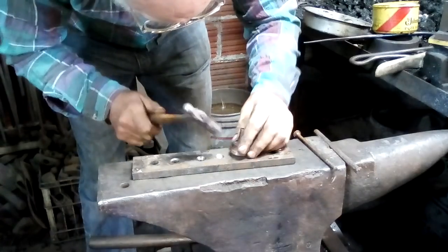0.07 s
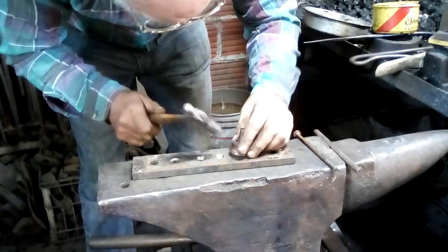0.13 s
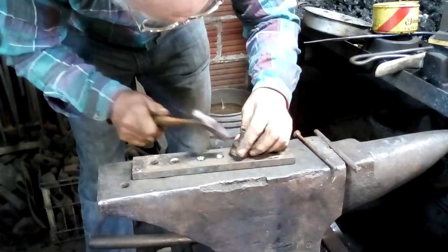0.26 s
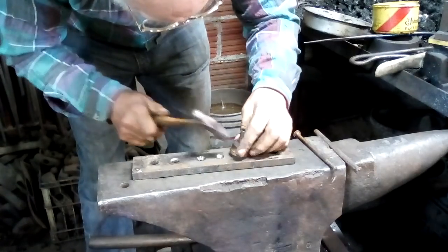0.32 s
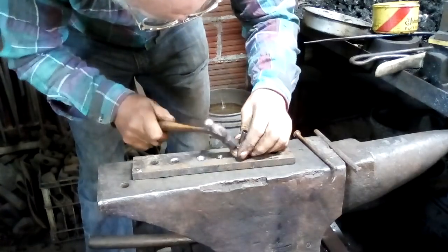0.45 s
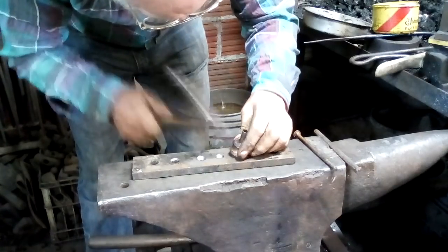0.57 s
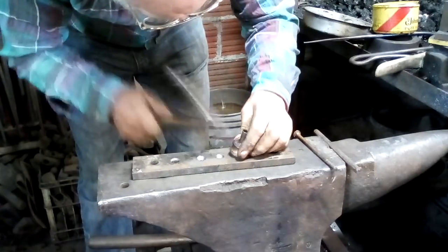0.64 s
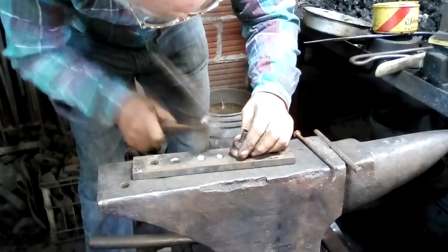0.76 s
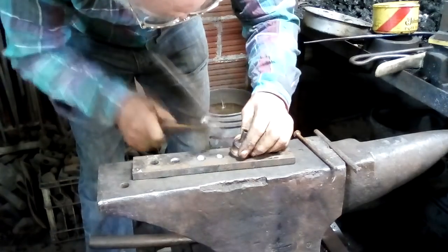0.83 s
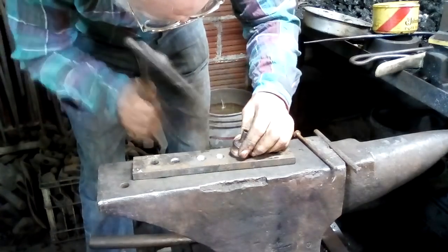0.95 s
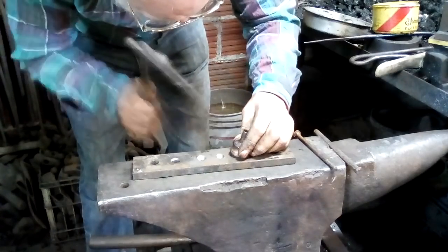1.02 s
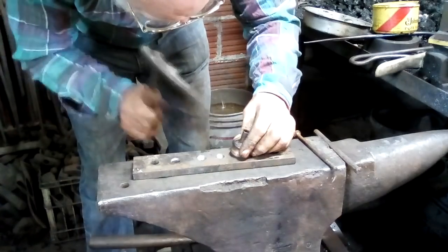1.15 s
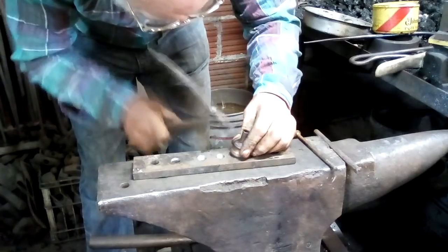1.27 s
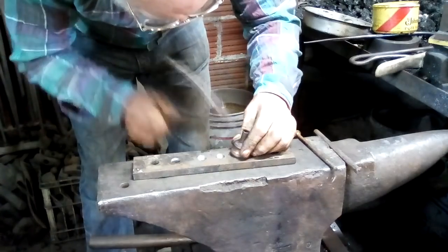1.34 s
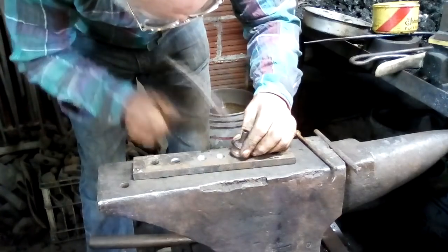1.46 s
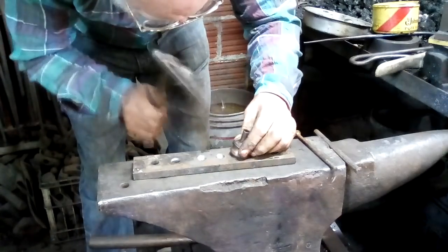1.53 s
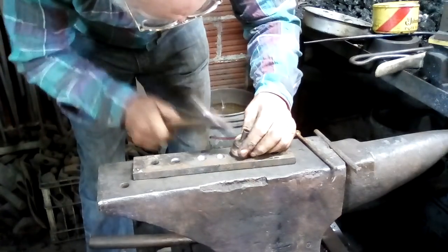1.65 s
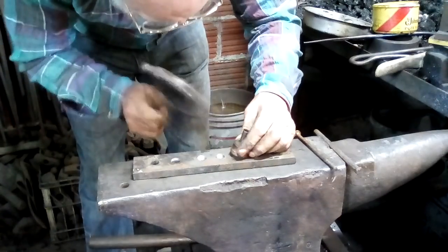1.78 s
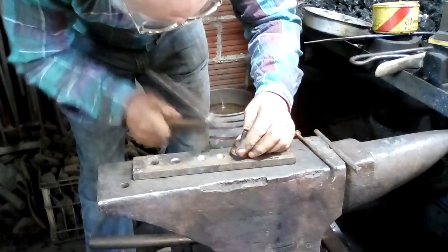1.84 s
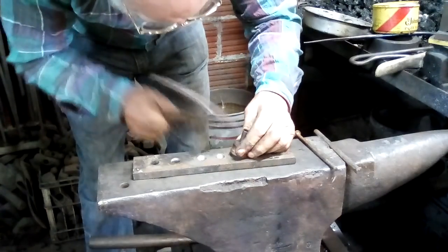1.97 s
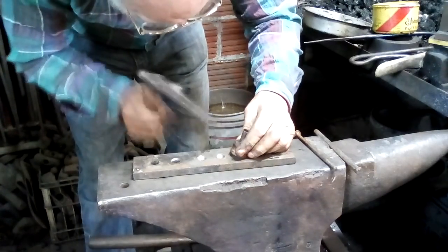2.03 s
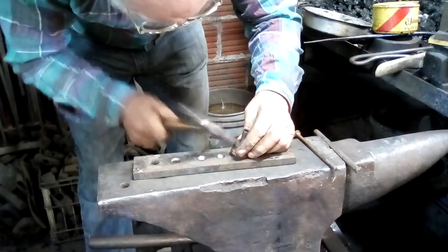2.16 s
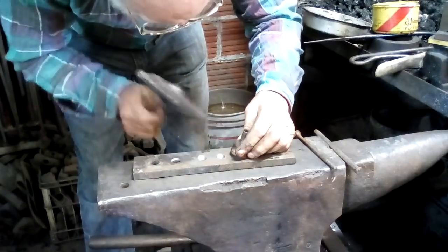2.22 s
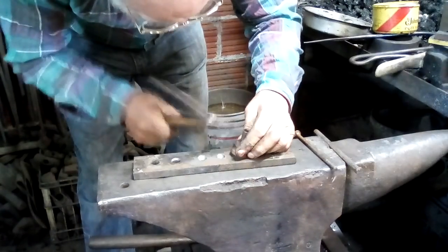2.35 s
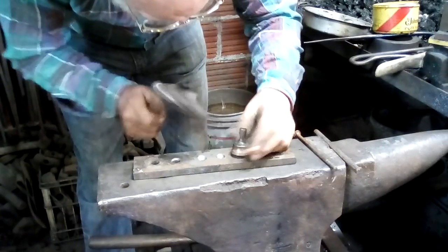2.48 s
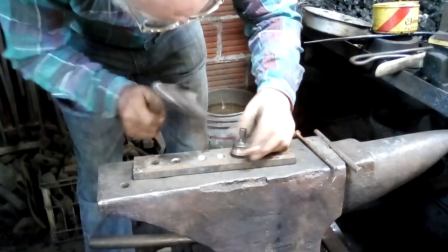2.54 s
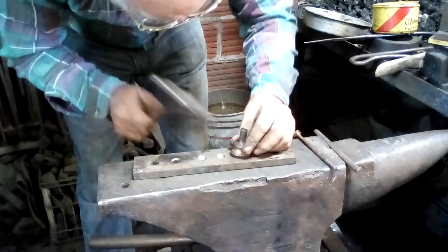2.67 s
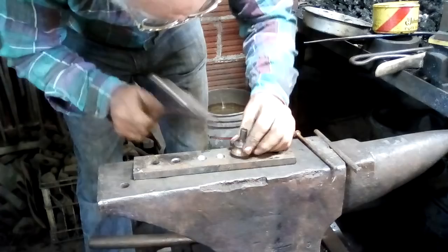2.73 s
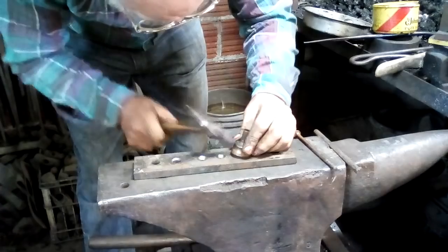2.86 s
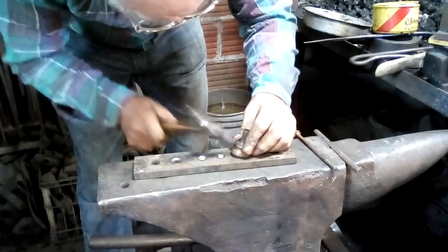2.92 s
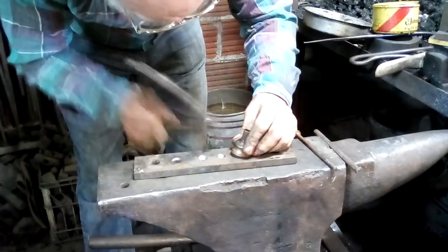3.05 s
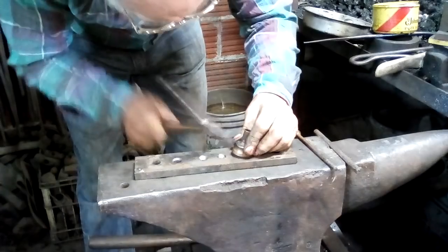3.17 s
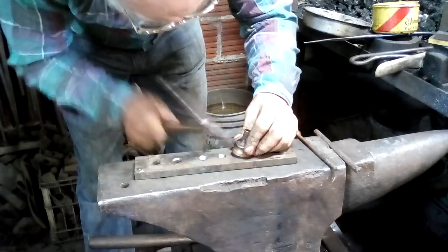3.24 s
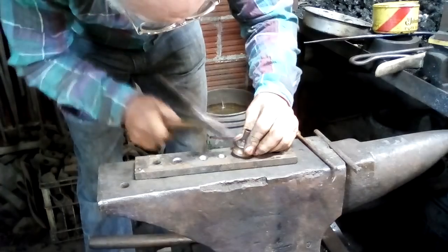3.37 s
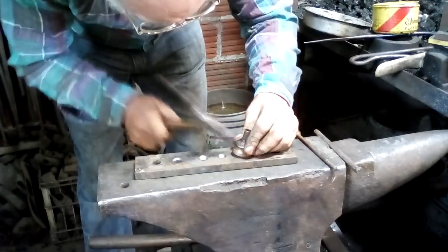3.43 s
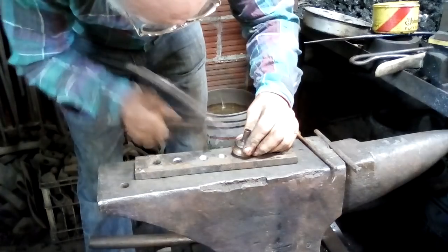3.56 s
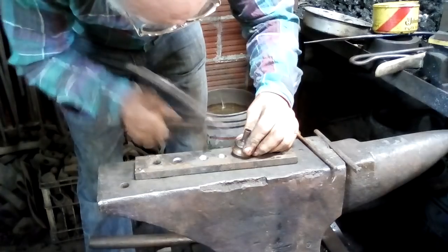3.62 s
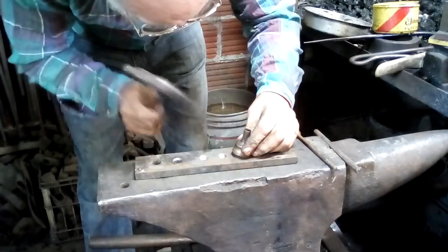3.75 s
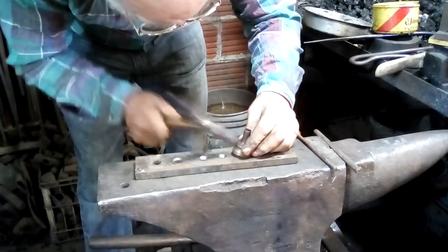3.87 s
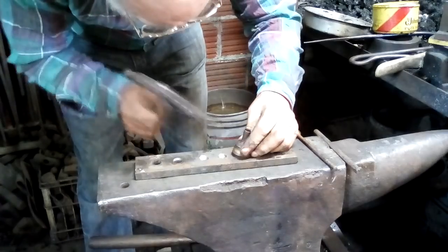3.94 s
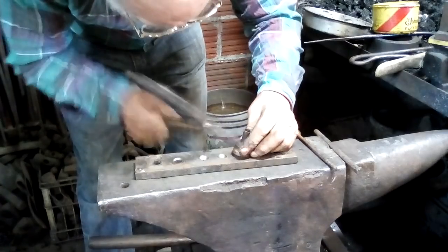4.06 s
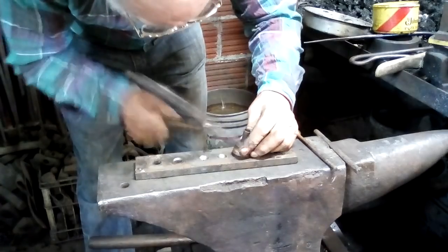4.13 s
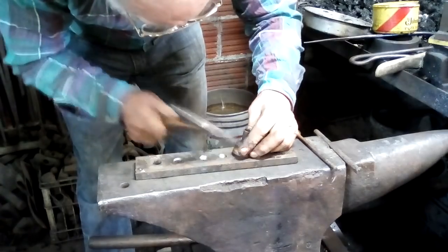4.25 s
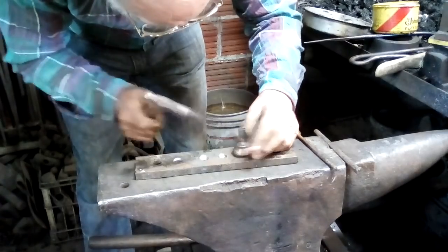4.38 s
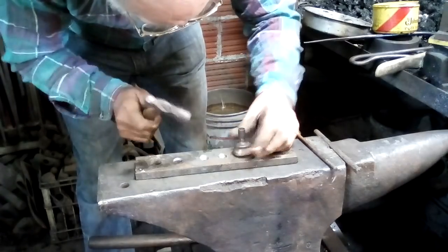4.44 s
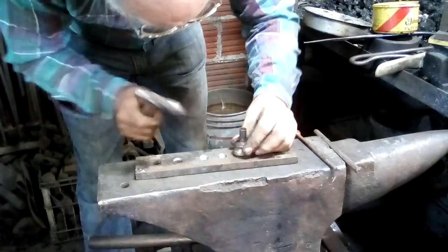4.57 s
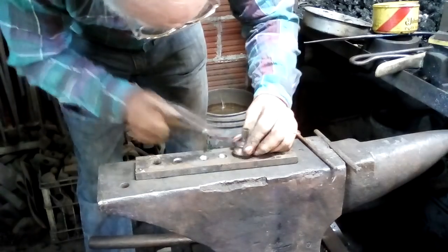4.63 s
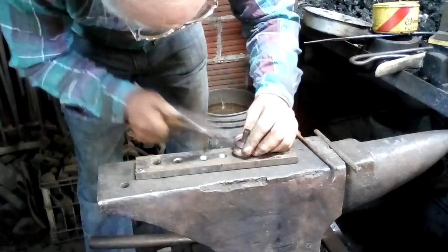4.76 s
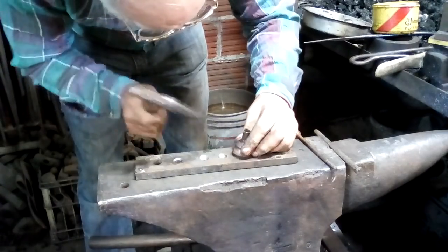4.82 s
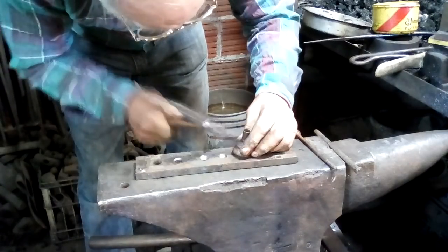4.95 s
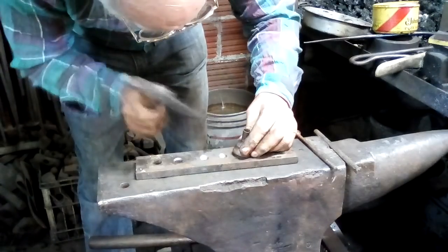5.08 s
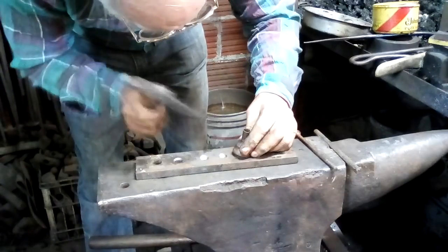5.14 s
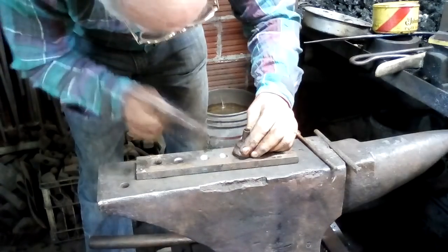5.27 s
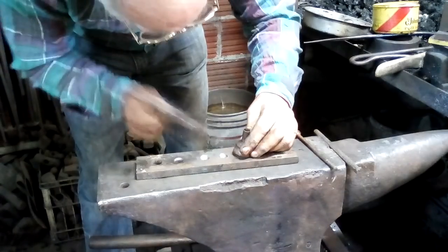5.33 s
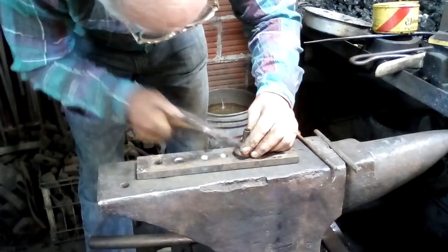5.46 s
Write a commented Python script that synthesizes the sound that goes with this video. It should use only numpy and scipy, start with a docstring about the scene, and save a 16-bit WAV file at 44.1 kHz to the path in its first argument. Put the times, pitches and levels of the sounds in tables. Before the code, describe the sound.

Quick, bright metallic hammer taps on a small steel ball and brass case on an anvil, about four a second, in a reverberant workshop.

```python
"""Over a quiet workshop background, a first light touch seats a steel ball in a small brass case,
which stands on a steel bar on an anvil; hammer blows follow, with more light touches in between.
Each blow is a burst of shaped noise with decaying sine modes, bounces once and excites the room.
A gain control ducks at the blows and recovers steadily, so the room swells up between them."""
import sys
import numpy as np
from scipy import signal
from scipy.fft import rfft, irfft
from scipy.io import wavfile
from scipy.ndimage import uniform_filter1d, minimum_filter1d

SR = 44100
rng = np.random.default_rng(int(sys.argv[2]) if len(sys.argv) > 2 else 0)


def waveform_to_disk(signal):
    """Save audio, clipped to [-1, 1], as 16-bit WAV at the path in sys.argv[1]."""
    frames = np.transpose(np.atleast_2d(signal))
    scaled = np.clip(frames, -1, 1) * 32767
    samples = np.round(scaled).astype(np.int16)
    wavfile.write(sys.argv[1], SR, samples)


N = 242550

AGE = np.arange(SR // 2) / SR   # seconds since a contact
BACKGROUND_DB = -59   # rms level
CUTOFF_HZ = 15900
# a square blow rings the hammer; the more it rings, the brighter the crack and the higher its knock
TREBLE_DB, TREBLE_PER_RING_DB = 1, 0.4
KNOCK_HZ, KNOCK_RISE_HZ_PER_DB = 3480, 171


def from_db(db):
    """Level is logarithmic: 20 dB is a factor of ten in amplitude."""
    return 10 ** (np.asarray(db) / 20)


def at_hz(points, hz, axis=1):
    """Spectra are smooth in log frequency: interpolate a table column on that axis."""
    table = np.array(points)
    return np.interp(np.log(hz + 1), np.log(table[:, 0]), table[:, axis])


def dying(t60, age=AGE):
    """Linear damping gives exponential decay: 60 dB in t60 seconds."""
    return np.exp(-np.log(1000) * age / t60)


def noise(spectrum, size):
    """Random phases under a fixed magnitude spectrum give steady coloured noise, here of rms 1."""
    hz = np.arange(size // 2 + 1) * SR / size
    phases = np.exp(2j * np.pi * rng.random(len(hz)))
    x = irfft(from_db(at_hz(spectrum, hz)) * phases, size)
    return x / x.std()


def lowpass(x, hz):
    """A second-order low-pass rolls off the treble at 12 dB per octave."""
    return signal.sosfilt(signal.butter(2, hz, fs=SR, output="sos"), x)


def even(x, width_hz):
    """Spectral whitening levels broad humps and dips of a random burst; its fine grain stays."""
    size = 2 * len(x)
    spectrum = rfft(x, size)
    power = uniform_filter1d(abs(spectrum) ** 2, max(int(width_hz * size / SR), 1))
    return irfft(spectrum / np.sqrt(abs(power) + 1e-9), size)[:len(x)]


def colour(x, spectrum):
    """A causal minimum-phase filter follows a table of (Hz, dB), by folding its cepstrum."""
    size = 2 * len(x)
    hz = np.arange(len(x) + 1) * SR / size
    cepstrum = irfft(np.log(from_db(at_hz(spectrum, hz))))
    # fold the negative times onto the positive ones
    cepstrum[1:len(x)] *= 2
    cepstrum[len(x) + 1:] = 0
    response = np.exp(rfft(cepstrum))
    return irfft(rfft(x, size) * response)[:len(x)]


def resonate(x, hz, boost_db, width_hz):
    """A broad, quickly damped resonance lifts one region of a sound."""
    peak = signal.lfilter(*signal.iirpeak(hz, hz / width_hz, fs=SR), x)
    return x + (from_db(boost_db) - 1) * peak


def add(track, s, sound):
    """Sound pressures superpose: sum a sound into a track from time s, cut at the end."""
    start = min(round(s * SR), N)
    track[..., start:start + sound.shape[-1]] += sound[..., :N - start]


def background():
    """Stationary coloured noise forms the quiet background of the workshop."""
    # Each row: frequency in Hz, relative level in dB per Hz.
    background_spectrum = [(25, -45), (60, -8.5), (120, -0.5), (220, -9), (300, -13), (550, -16),
                           (1800, -22), (2500, -25), (4000, -21), (6500, -27), (7700, -43), (13800, -41),
                           (15000, -27)]
    return from_db(BACKGROUND_DB) * noise(background_spectrum, N)


def workshop(x, build_s=0.012, even_hz=70):
    """Reverberation: dense echoes build up within milliseconds, then decay at a rate set by frequency."""
    # Each row: frequency in Hz, level in dB, reverberation time t60 in seconds.
    room_bands = [(54.6, -3, 1), (175, 10, 0.6), (423, 2.5, 0.81), (1310, 0.5, 0.54), (4200, -5, 0.54),
                  (5810, -1, 0.45), (9330, -10, 0.4), (11600, -8.5, 0.18), (15500, -13.5, 0.24)]
    age = np.arange(SR) / SR
    hz = np.arange(SR // 2 + 1)   # bins of a one-second response
    white = rfft(rng.standard_normal(SR))
    echoes = np.zeros(SR)
    edges = np.geomspace(30, SR / 2, num=21)
    for low, high in zip(edges, edges[1:]):
        band = irfft(white * ((hz >= low) & (hz < high)), SR)
        t60 = at_hz(room_bands, np.sqrt(low * high), axis=2)
        echoes += band * dying(t60, age)
    build_up = 1 - np.exp(-(age / build_s) ** 2)
    response = colour(even(echoes * build_up, even_hz), room_bands)
    return signal.fftconvolve(x, response)[:N]


def crack(snap_t60=0.0024, clatter_db=-16, clatter_t60=0.035, rise_s=0.00039, even_hz=500, level_db=21):
    """Impact noise: a broadband snap, then a brief clatter of ball, case and bar against each other."""
    # Colour of the contact. Each row: frequency in Hz, relative level in dB per Hz.
    crack_spectrum = [(100, -26.5), (400, -19), (620, -24.5), (1100, -21.5), (1600, -9), (2250, -13.5),
                      (2900, -4), (3600, -1), (4600, -5), (6200, -4), (7900, -20), (10500, -26),
                      (13600, -26.5), (15500, -19.5)]
    decay = dying(snap_t60) + from_db(clatter_db) * dying(clatter_t60)
    envelope = (1 - np.exp(-AGE / rise_s)) * decay
    burst = even(envelope * rng.standard_normal(len(AGE)), even_hz)
    return from_db(level_db) * colour(burst, crack_spectrum)


def touches():
    """Soft contact filters out the treble; damped by the fingers, the case rings only briefly."""
    # Seating of ball and case. Each row: start in seconds, level in dB, ring frequency in Hz,
    # ring boost in dB, top edge in Hz.
    touch_events = [ (0.4286, -11, 6550, 15, 16000), (2.6770, -40, 3100, 5, 5500),
                    (2.7120, -43, 3200, 5, 5500), (4.5025, -24, 4900, 6, 5200),
                    (4.5202, -23, 4190, 4, 5000), (4.6765, -17, 3300, 21, 7000)]
    # Resonances of the held case, heard in every touch. Each row: frequency in Hz, boost in dB, width in Hz.
    case_resonances = [(197, 10, 320), (1290, 7.5, 180), (4100, 8, 370)]
    out = np.zeros(N)
    for s, level_db, ring_hz, ring_db, edge_hz in touch_events:
        click = crack(snap_t60=0.0099, clatter_db=-2)
        click = lowpass(lowpass(click, edge_hz), edge_hz)
        for hz, boost_db, width_hz in case_resonances:
            click = resonate(click, hz, boost_db, width_hz)
        click = resonate(click, ring_hz, ring_db, width_hz=340)
        add(out, s, from_db(level_db) * click)
    return out


def ring(modes, detune=0.0012, scatter_db=4.0):
    """Modal superposition: grip and point of contact shift pitches and shares; total energy stays."""
    envelopes = [from_db(db) * dying(t60) for hz, db, t60 in modes]
    x = np.zeros(len(AGE))
    for envelope, (hz, db, t60) in zip(envelopes, modes):
        share = from_db(scatter_db * rng.normal())
        mode_hz = hz * (1 + detune * rng.normal())
        x += envelope * share * np.sin(2 * np.pi * (mode_hz * AGE + rng.random()))
    nominal_energy = np.sum(np.square(envelopes)) / 2
    return x * np.sqrt(nominal_energy / np.sum(x ** 2))


def contact(bar_db, hammer_db, ping_db, treble_hz=8500):
    """Impact excitation: how squarely it lands sets the knock, the brightness and the modes that ring."""
    # Modes of the bar, the hammer and a high ping.
    # Each row: frequency in Hz, level in dB, decay time t60 in seconds.
    bar_modes = [(1345, -29, .018), (1410, -29, .018), (1468, -30, .03), (2586, -26, .07), (2680, -26, .04),
                 (2752, -24, .1), (3500, -32, .1), (3555, -32, .1)]
    hammer_modes = [(5255, -23, .035), (5320, -19.5, .06), (5370, -21, .045), (5420, -17.5, .11),
                    (5480, -27, .04), (5633, -32, .1), (8505, -34, .13), (9766, -42, .2), (11460, -42, .18)]
    ping_modes = [(8342, -27, .08), (8705, -30, .07), (11200, -33, .035), (12380, -34, .08),
                  (13395, -36, .09), (15165, -22, .06), (15205, -20, .09)]
    treble_db = TREBLE_DB + TREBLE_PER_RING_DB * hammer_db
    knock_hz = KNOCK_HZ + KNOCK_RISE_HZ_PER_DB * max(hammer_db, 0)
    snap = colour(crack(), [(treble_hz / np.sqrt(2), 0), (treble_hz, treble_db)])
    snap = resonate(snap, knock_hz, boost_db=4, width_hz=420)
    rings = from_db(bar_db) * ring(bar_modes)
    rings += from_db(hammer_db) * ring(hammer_modes)
    rings += from_db(ping_db) * ring(ping_modes)
    return np.array([snap, rings])


def hammering():
    """Rebound: each blow is followed by one bounce about a fiftieth of a second later."""
    # Each row: start in seconds, force in dB, hammer ring in dB, ping in dB, bounce in dB re the blow.
    blows = [ (0.8449, 7, -0.5, 1.5, -30), (1.1088, 4.5, 3, -3, -6.5), (1.3596, 7.5, 8, 4.5, -8),
             (1.6101, 3, 4, -12, -3.5), (1.855, 3, 3, -12, -5.5), (2.0966, 3, 4.5, -5, -10.5),
             (2.343, 3, 6.5, -7, -9), (2.9133, 3, 2, 0, -6), (3.1790, 7, 5, 4.5, -11.5),
             (3.4298, 5.5, 2.5, 2.5, -7.5), (3.6760, 0.5, 5.5, 4, 2), (3.9226, 2, 4, -7, 0.5),
             (4.1707, 4, 3, 4.5, -5), (4.6767, 0, -9, -3.5, -11.5), (4.9572, 4, -3, -3, -5.5),
             (5.2211, 6.5, -4.5, -0.5, -5.5), (5.4777, 7.5, -7, -9, -8)]
    # As the ball is driven home, the bounce comes later and the bar rings more.
    # Each row: time in seconds, bounce delay in seconds, bar ring in dB.
    seating = [(1.4, 0.014, -0.5), (3.3, 0.0225, 3)]
    out = np.zeros((2, N))   # cracks, rings
    times, delays, bar_levels = np.transpose(seating)
    for s, force_db, hammer_db, ping_db, bounce_db in blows:
        delay = np.interp(s, times, delays)
        bar_db = np.interp(s, times, bar_levels)
        blow = contact(bar_db, hammer_db, ping_db)
        bounce = contact(bar_db, hammer_db, ping_db)
        add(out, s, from_db(force_db) * blow)
        add(out, s + delay, from_db(force_db + bounce_db) * bounce)
    return out


def scene(touch_room_db=-2, ring_direct_db=-6):
    """Direct and reverberant sound superpose; the ring is heard mostly by way of the walls."""
    cracks, rings = hammering()
    taps = touches()
    direct = cracks + from_db(ring_direct_db) * rings + taps
    echoes = workshop(cracks + rings + from_db(touch_room_db) * taps)
    return (direct + echoes + background())[None]


def duck(x, limit_db, share, sense_s, ahead_s, hold_s, release_db_per_s):
    """Gain control: removes a share of the excess just ahead of a loud sound, holds, recovers steadily."""
    ahead, hold = max(int(ahead_s * SR), 1), max(int(hold_s * SR), 1)
    power = np.abs(uniform_filter1d(x ** 2, max(int(sense_s * SR), 1)))
    level_db = 10 * np.log10(power + 1e-12)
    gain_db = share * np.minimum(limit_db - level_db, 0)
    gain_db = minimum_filter1d(gain_db, ahead + hold, origin=(hold - 1) // 2, mode="nearest")
    # the gain may rise no faster than the release rate
    recovery = release_db_per_s * np.arange(N) / SR
    gain_db = np.minimum.accumulate(gain_db - recovery) + recovery
    return x * from_db(uniform_filter1d(gain_db, ahead))


def record(dry):
    """Dynamic compression, then fast peak limiting, then a steep low-pass at the top."""
    x = duck(dry[0], limit_db=-16.0, share=0.85, sense_s=0.0033, ahead_s=0.033, hold_s=0.027,
             release_db_per_s=226)
    x = duck(x, limit_db=-4.0, share=1, sense_s=0.00013, ahead_s=0.0002, hold_s=0.0005,
             release_db_per_s=2497)
    top_cut = signal.ellip(10, .3, 80, CUTOFF_HZ, fs=SR, output="sos")
    return signal.sosfilt(top_cut, x)[None]


dry = scene()
out = record(dry)
waveform_to_disk(out)
```